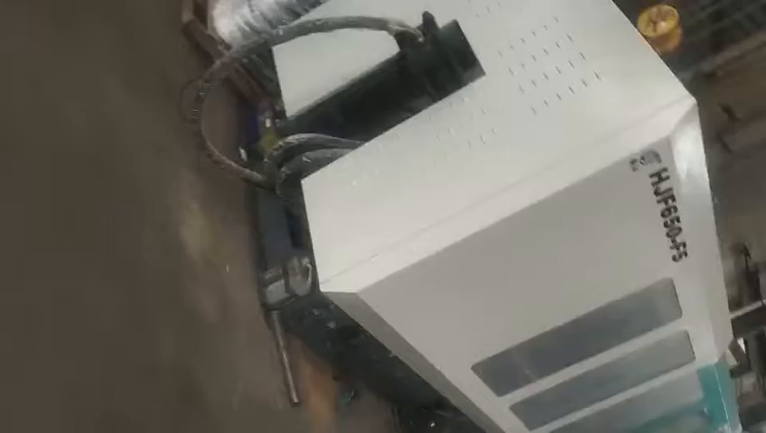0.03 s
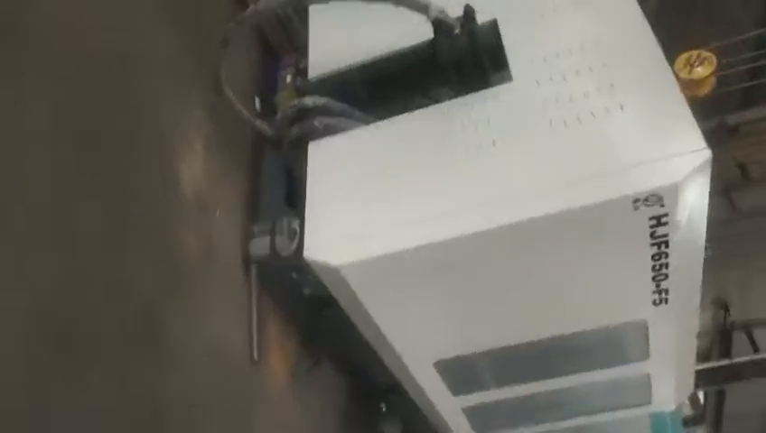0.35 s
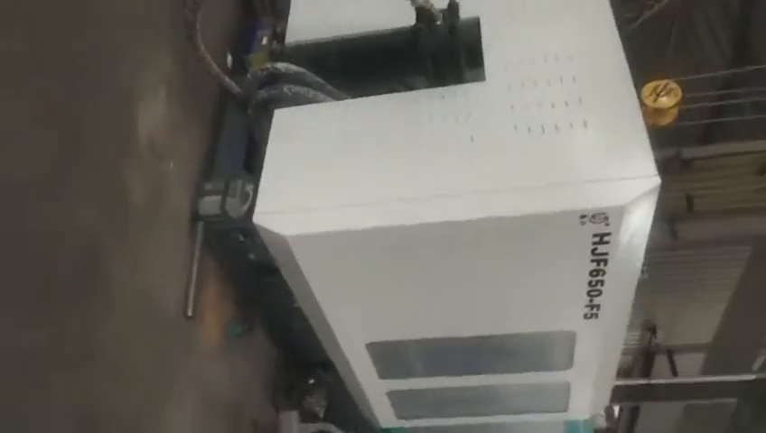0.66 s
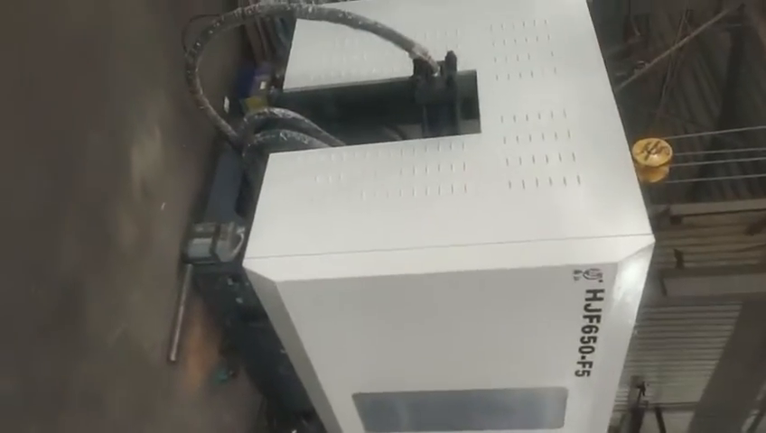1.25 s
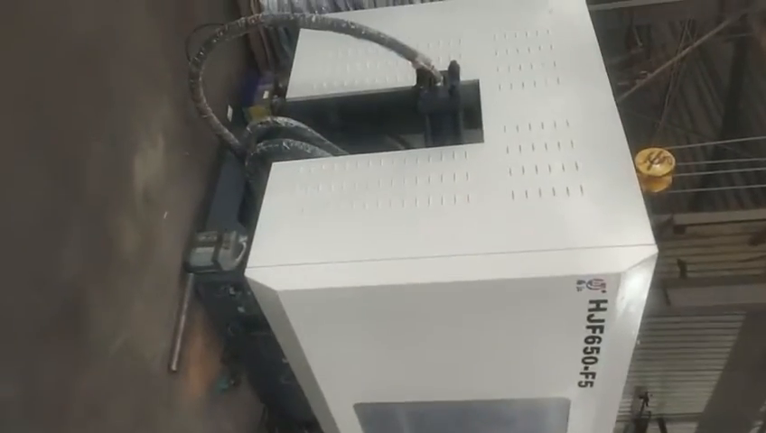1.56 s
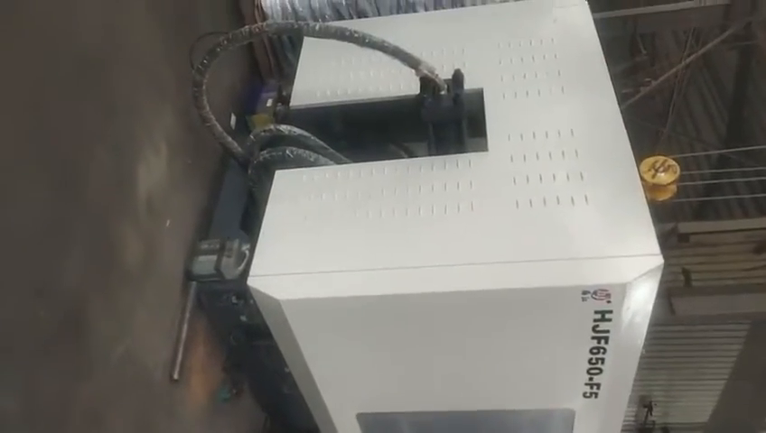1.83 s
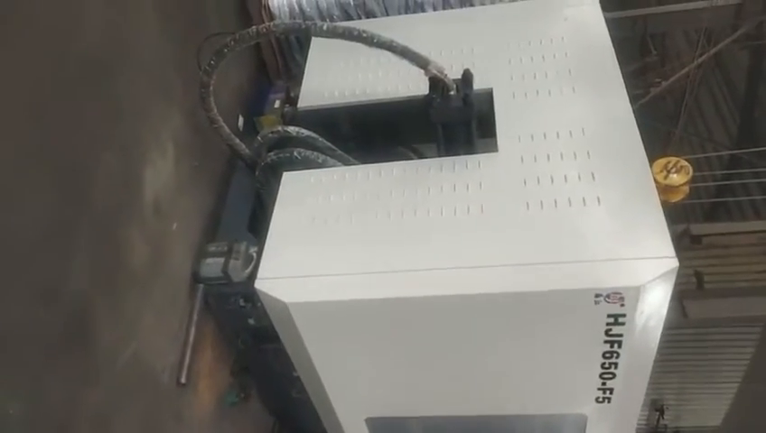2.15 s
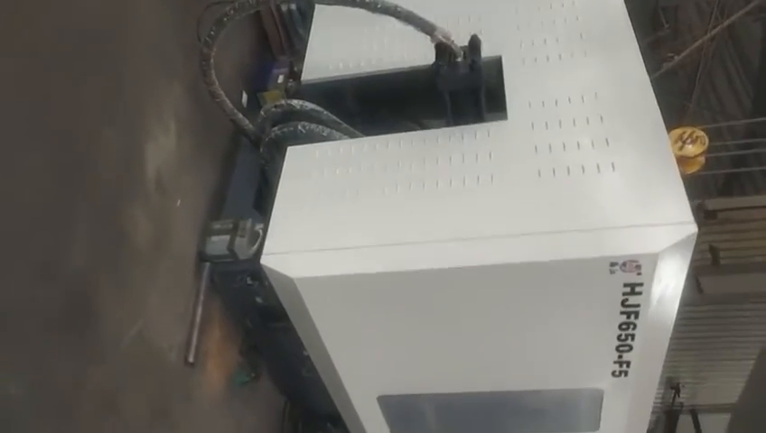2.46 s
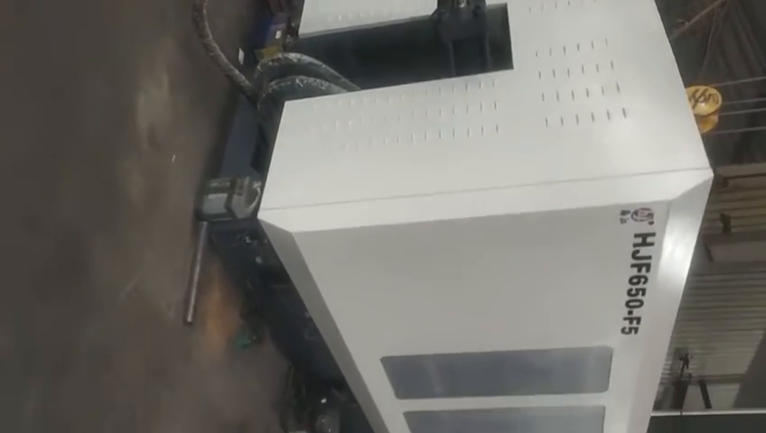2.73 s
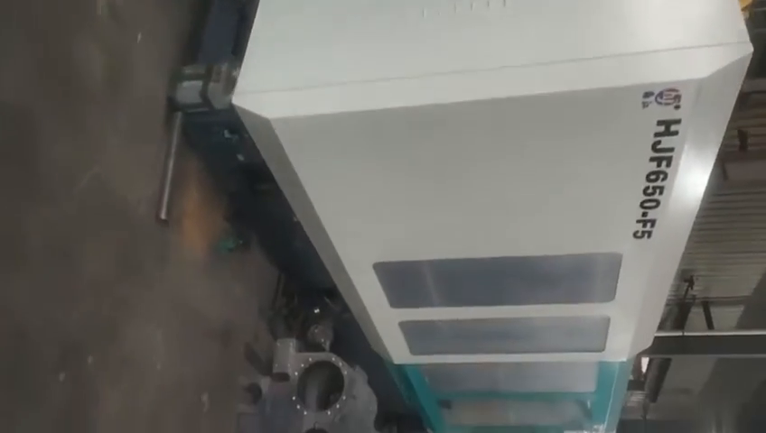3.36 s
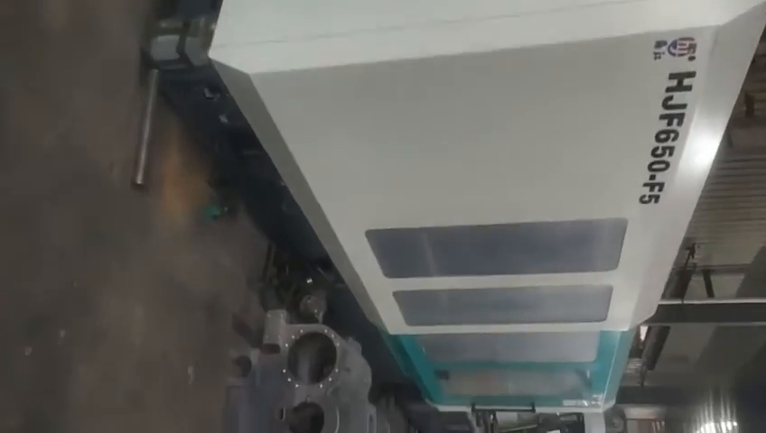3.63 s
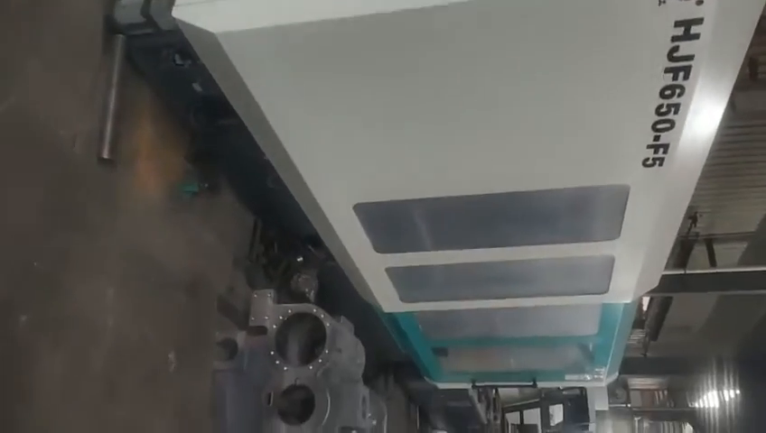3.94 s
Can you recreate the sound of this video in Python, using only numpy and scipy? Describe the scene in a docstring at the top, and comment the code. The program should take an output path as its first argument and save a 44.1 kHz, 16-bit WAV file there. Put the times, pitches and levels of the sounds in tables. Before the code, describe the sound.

An injection moulding machine drones and whines in a factory hall, with brief metal squeaks.

```python
"""An injection moulding machine in a factory hall, heard in stereo from a shifting position.
The sound fades in on the rush of other plant, motor hums, a hydraulic pump's whine and oil ringing in
the pipework. Early on, metal squeals three times, ever weaker. From about one second a sliding part
squeaks on each stroke, rasping softly on its way back, and the hall rings after the squeals and strokes.
Toward the end a thin leak of compressed air opens."""
import sys
import numpy as np
from scipy import signal
from scipy.fft import rfft, irfft, next_fast_len
from scipy.io import wavfile
from scipy.ndimage import uniform_filter1d, map_coordinates

SR = 44100
rng = np.random.default_rng(int(sys.argv[2]) if len(sys.argv) > 2 else 0)


def int16_out(signal):
    """Quantize to a 16-bit WAV file."""
    q = np.round(np.clip(np.atleast_2d(signal).T, -1, 1) * 32767)
    wavfile.write(sys.argv[1], SR, q.astype(np.int16))


N = 176400

# how alike the hall sounds at the left and right microphones: frequency_hz, correlation
MIC_LIKENESS = [(100, 0.95), (180, 0.96), (320, 0.9), (570, 0.44), (1000, 0.091), (1700, -0.27),
                (3000, -0.034)]
# how much louder it is at the left microphone: frequency_hz, lean_db
MIC_LEAN = [(100, 0.5), (600, 1.1), (1000, 0.5), (2000, 5), (2800, 5), (3600, 2), (5000, .5), (5600, -4.5),
            (6300, -8.5), (7000, 0), (7800, 8), (9500, 11.5)]
SIDES = np.array([[.5], [-.5]])  # splits a level or phase between left and right


def amp(db):
    """Decibels to gain."""
    return 10 ** (np.asarray(db) / 20)


def unit(x):
    """Scale to rms 1."""
    return x / np.sqrt(np.mean(np.abs(x) ** 2) + 1e-20)


def along(points, hz):
    """Read (frequency_hz, value) points on a log frequency axis."""
    point_hz, values = np.transpose(points)
    return np.interp(np.log(hz + 1), np.log(point_hz + 1), values)


def curves(rows):
    """One value per sample for each column after the time."""
    times, *columns = np.transpose(rows)
    return [np.interp(np.arange(N) / SR, times, column) for column in columns]


def wobble(rate):
    """A smooth random curve, rate knots a second."""
    knots = rng.standard_normal(int(N / SR * rate) + 4)
    coarse = map_coordinates(knots, [np.linspace(0, N / SR * rate, 400)])
    return signal.resample_poly(coarse, N // len(coarse), 1)


def filtered(x, response):
    """Filter x by a gain given as a function of frequency."""
    size = next_fast_len(N + SR // 2)
    return irfft(rfft(x, size) * response(np.fft.rfftfreq(size, 1 / SR)), size)[..., :N]


def pan(lean_db):
    """Left and right gains; a positive lean favours the left."""
    return amp(SIDES * lean_db)


def mic_angle(hz):
    """The angle in radians whose cosine is the likeness of the two microphones."""
    return np.arccos(np.clip(along(MIC_LIKENESS, hz), -1, 1))


def diffuse_noise(spectrum, patchy_db):
    """Stereo noise from all round, of rms 1, with patches of random gain in time and frequency."""
    cells = signal.stft(rng.standard_normal((2, N)), nperseg=512)[2]
    patches = uniform_filter1d(rng.standard_normal(cells.shape[1:]), size=5, axis=0)
    patches = uniform_filter1d(patches, size=14, axis=1)
    pair = signal.istft(cells * amp(patchy_db * unit(patches)), nperseg=512)[1][:, :N]

    def mid_side_gains(hz):
        turn = mic_angle(hz) / 2
        return amp(along(spectrum, hz)) * [np.cos(turn), np.sin(turn)]

    mid, side = filtered(pair, mid_side_gains)
    return unit(filtered(np.array([mid + side, mid - side]), lambda hz: pan(along(MIC_LEAN, hz))))


def fuzzy_tone(hz, width_hz, rough=1):
    """A stereo tone on a moving pitch; rough (0-1) is the share of narrow noise in it."""
    offset_hz = np.fft.fftfreq(len(hz), 1 / SR)
    phases = np.exp(2j * np.pi * rng.random((2, len(hz))))
    flutter = np.fft.ifft(phases / (1 + (offset_hz / width_hz) ** 2 / 2) ** 2)
    clean = np.exp(2j * np.pi * rng.random()) * np.array([[1], [1j]])
    carrier = np.exp(2j * np.pi * np.cumsum(hz) / SR)
    return unit(np.real((np.sqrt(rough) * unit(flutter) + np.sqrt(1 - rough) * clean) * carrier))


def burst(start_s, length_s, db, from_hz, to_hz, width_hz, rough=1, late=1):
    """A short sound that swells, glides and stops; late above 1 moves its peak toward the end."""
    progress = np.clip(np.arange(SR // 2) / SR / length_s, 0, 1)
    swell = 2 * np.sqrt(progress ** late * (1 - progress ** late))
    tone = fuzzy_tone(from_hz + (to_hz - from_hz) * progress, width_hz, rough)
    out, start = np.zeros((2, N + SR)), round(start_s * SR)
    out[:, start:start + len(swell)] = amp(db) * swell * tone
    return out[:, :N]


def hall(x):
    """The hall's long reverberant tail, dying fastest in the high treble."""
    decay = [(1000, 0.87), (4000, 1.6), (5200, 1.22), (6200, 0.42)]  # time to die by 60 dB: frequency_hz, decay_s
    hz, t, cells = signal.stft(rng.standard_normal((2, SR)), SR, nperseg=256)
    tail = signal.istft(cells * amp(-60 * t / along(decay, hz)[:, None]), SR, nperseg=256)[1]
    return signal.fftconvolve(x, tail / np.linalg.norm(tail[0]), axes=1)[:, :N]


def high_hiss():
    """Two very faint, brief bursts of high hiss near 14.6 kHz."""
    hisses = [(0.326, .05, -74), (2.747, 0.13, -66.5)]  # each burst: start_s, length_s, level_db
    return sum(burst(*hiss, from_hz=14600, to_hz=14600, width_hz=1300) for hiss in hisses)


def plant():
    """Machinery all round the hall: rumble, rush, hiss and a brief surge in the low mids."""
    # spectra of the four noises: frequency_hz, relative_db
    rumble_band = [(20, -46), (40, -23.5), (60, -23.5), (85, -10.5), (105, -15.5), (135, -1), (180, -2),
                   (230, -1), (290, .5), (400, -2.5), (560, -8), (800, -8.5), (1200, -13), (1700, -51),
                   (3000, -120)]
    surge_band = [(150, -29.5), (280, 0.5), (380, 1), (460, -9), (700, -29.5), (2000, -120)]
    rush_band = [(650, -27), (1100, -7), (1290, -6.5), (1420, -2), (1680, -3.5), (1940, -5.5), (2650, -7.5),
                 (3070, -13), (3600, -15), (4700, -35.5), (7900, -120)]
    hiss_band = [(1900, -39), (3200, -7), (4000, -1), (4750, 2), (5200, -3.5), (5550, -4.5), (5900, -10.5),
                 (6900, -10), (7700, -12), (9000, -20.5), (10000, -33.5), (11500, -120)]
    levels = [(0.22, -37.5, -41), (0.45, -36.5, -41.5), (0.7, -36, -41.5), (1.2, -37, -40), (2, -37, -41.5),
              (3, -37, -41), (4, -38.5, -41.5)]  # course of the din, before the trims below: time_s, rumble_db, rush_db
    surge_level = [(0.4, -46), (0.6, -41), (0.85, -44), (1.1, -45.5), (1.5, -55), (2.2, -64)]  # the low mids swell: time_s, level_db
    hiss_level = [(0.4, -42.5), (1.5, -42.5), (2.2, -42.5), (2.9, -42.5), (4, -43.5)]  # the hiss barely moves: time_s, level_db
    rumble_db, rush_db = curves(levels)
    (hiss_db,), (surge_db,) = curves(hiss_level), curves(surge_level)
    return (amp(rumble_db + 0.5) * diffuse_noise(rumble_band, patchy_db=1)
            + amp(surge_db) * diffuse_noise(surge_band, patchy_db=-1.5)
            + amp(rush_db + 5) * diffuse_noise(rush_band, patchy_db=0.82)
            + amp(hiss_db) * diffuse_noise(hiss_band, patchy_db=1.06))


def air_leak():
    """Compressed air hisses from a thin leak that opens late."""
    leak_level = [(2.7, -86), (2.78, -56.5), (2.98, -54.5), (3.3, -56.5), (4, -58.5)]  # the leak opening: time_s, level_db
    leak_band = [(5500, -40), (7000, 1.5), (7700, 0), (9000, -11.5), (10000, -12), (11500, -120)]  # its spectrum: frequency_hz, relative_db
    leak_db, = curves(leak_level)
    return amp(leak_db) * diffuse_noise(leak_band, patchy_db=1.5)


def motors():
    """Motor and fan hums, with one faint tone of the pump, swell as the microphones move; the drive adds a
    faint switching whistle."""
    tones = [(114, -49, 1, -0.05), (184.1, -39.5, 1.5, -0.22), (524.7, -50.5, 2, .3), (666.9, -45, 0, 0.33)]  # the four hums: pitch_hz, level_db, lean_db, left_lead_rad
    swells = [(0.3, -14, -5, -6, -2.5), (0.46, 2, -1, -6, 0), (0.7, -7, 1.5, -1.5, -1),
              (1.1, -1, -3, -4, .5), (1.3, 0, 1, -4, 0), (1.7, 3.5, 0, -14, 2.5), (2.15, 3.5, 0, 3, -1.5),
              (2.5, -2.5, 1, -8, -0.5), (2.83, -5.5, .5, -3, -0.5), (3, -1.5, -1, -12.5, -10),
              (3.4, -2, -1, 1, -1), (3.7, -15, -4, -3, -9), (4, -20, -12, 0, -.5)]  # change with position: time_s, then gain_db for each hum, low to high
    t, hums = np.arange(N) / SR, np.zeros((2, N))
    for (hz, db, lean_db, lead_rad), swell_db in zip(tones, curves(swells)):
        gain = amp(db + swell_db + 0.6 * wobble(5.75)) * pan(lean_db)
        hums += gain * np.sin(2 * np.pi * (hz * t + rng.random()) + SIDES * lead_rad)
    whistle = sum(amp(-82.5 + wobble(4.2)) * np.sin(2 * np.pi * hz * t) for hz in (9860, 10149))
    return np.sqrt(2) * (hums + pan(lean_db=8) * whistle)


def pump():
    """The pump whines at multiples of its shaft rate, each wavering and scattered by the hall."""
    main_orders = [(10, -56.5), (12, -53.5), (42, -57), (48, -61.5), (58, -54), (60, -51.5), (62, -45.5),
                   (63, -53), (88, -52), (90, -51.5), (100, -56.5), (110, -54), (128, -63)]  # tones of the whine: shaft_order, level_db
    shaft_hz, waver_db = 23.895, 2
    orders = {order: -61 + 2.5 * rng.uniform(-1, 1) for order in range(24, 120, 2)}  # weak comb, dB
    orders.update({round(order): db for order, db in main_orders})
    t, whine = np.arange(N) / SR, np.zeros((2, N))
    for order, db in orders.items():
        hz = order * shaft_hz
        mic_phase = mic_angle(hz) * rng.choice([-1, 1]) * SIDES
        gain = amp(db + waver_db * wobble(2.75)) * pan(along(MIC_LEAN, hz))
        whine += gain * np.sin(2 * np.pi * (hz * t + rng.random()) + mic_phase)
    return np.sqrt(2) * whine


def oil_flow():
    """Oil rings in the pipework and throbs a little unevenly, with a second ring of steady level."""
    ringing = [(0.2, -56, 1520), (0.38, -42.5, 1528), (0.65, -45, 1525), (0.9, -40, 1531),
               (1.12, -35.5, 1537), (1.33, -43, 1529), (1.52, -38.5, 1528), (1.8, -42, 1512),
               (2.3, -56, 1507), (2.85, -57, 1510), (3.08, -44.5, 1517), (3.6, -51, 1508),
               (3.95, -54, 1501)]  # the main ring: time_s, level_db, pitch_hz
    throb_hz, throb_depth, drift_rad = 19, .65, 1.3
    ring_db, ring_hz = curves(ringing)
    throb_phase = 2 * np.pi * throb_hz * np.arange(N) / SR + drift_rad * wobble(6)
    throb = unit(1 + throb_depth * np.sin(throb_phase))
    upper_ring = amp(-48) * fuzzy_tone(1.1 * ring_hz, width_hz=61)
    main_ring = amp(ring_db) * throb * fuzzy_tone(ring_hz, width_hz=38, rough=0.49)
    return upper_ring + pan(lean_db=1.5) * main_ring


def metal_squeal():
    """Metal catches three times, ever weaker, in a thin squeal that swells quickly."""
    partials = [(3788, -43), (6600, -58)]  # the metal's two tones: pitch_hz, level_db
    catches = [(.815, 0.22, -0.5), (1.119, 0.085, -3.5), (1.33, 0.081, -8)]  # each catch: start_s, length_s, gain_db
    out = np.zeros((2, N))
    for start_s, length_s, gain_db in catches:
        for hz, db in partials:
            tone = burst(start_s, length_s, db + gain_db, hz, hz, width_hz=45, rough=.8, late=0.71)
            out += pan(along(MIC_LEAN, hz) - 2.5) * tone
    return out


def sliding_part():
    """Each stroke scrapes, squeaks upward and drags; the way back only rasps, off to the right."""
    squeaks = [(1.179, .018, -34, 0.9), (2.456, 0.015, -32.5, 0.8), (3.641, 0.022, -30.5, .3)]  # forward strokes: start_s, length_s, level_db, noise_share
    rasps = [(0.43, 0.057, -49, 5440, 328), (1.759, .1, -49.5, 5480, 360), (3.03, .07, -45.5, 5320, 395),
             (3.453, .022, -42.5, 5300, 241)]  # return strokes: start_s, length_s, level_db, pitch_hz, width_hz
    strokes = np.zeros((2, N))
    for start, length, db, rough in squeaks:
        scrape = burst(start - 0.03, 0.02, db - 10.5, from_hz=6000, to_hz=6000, width_hz=530)
        squeak = burst(start, length, db, from_hz=4750, to_hz=5280, width_hz=200, rough=rough, late=1.35)
        drag = burst(start + 0.016, 0.061, db - 7.5, from_hz=4437, to_hz=4437, width_hz=520)
        strokes += scrape + squeak + drag
    returns = sum(burst(start, length, db, hz, hz, width) for start, length, db, hz, width in rasps)
    return pan(lean_db=0.5) * strokes + pan(lean_db=-8.5) * returns


def scene():
    """The drone, with the friction sounds ringing in the hall."""
    friction = sliding_part() + metal_squeal()
    drone = plant() + motors() + pump() + oil_flow() + air_leak() + high_hiss()
    return drone + friction + amp(0.5) * hall(friction)


def record(dry):
    """The recorder fades in and keeps nothing above its band limit."""
    fade_in = [(.169, -110), (.172, -14), (.2, -10), (.245, -3.5), (.3, -1.5), (.36, 1), (.46, 1)]  # recorder gain: time_s, gain_db
    fade_db, = curves(fade_in)
    return filtered(dry * amp(fade_db), lambda hz: hz < 15500)


dry = scene()
out = record(dry)
int16_out(out)
```